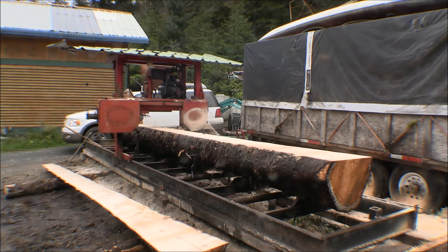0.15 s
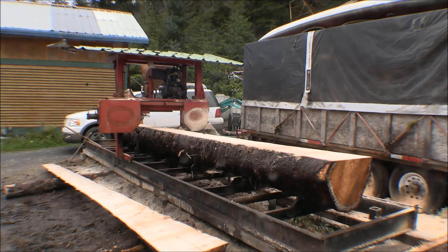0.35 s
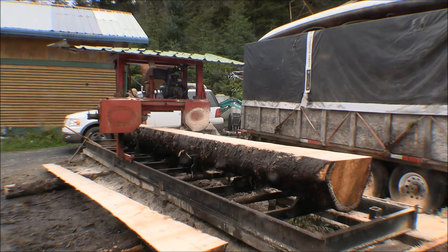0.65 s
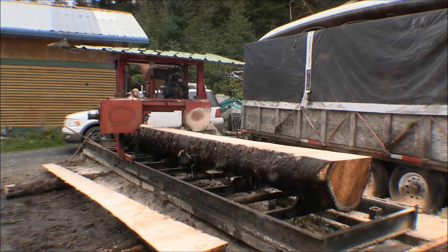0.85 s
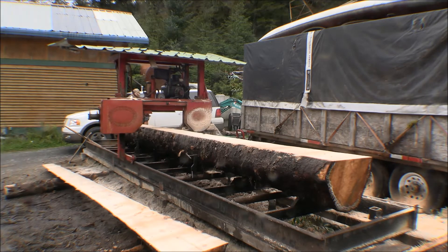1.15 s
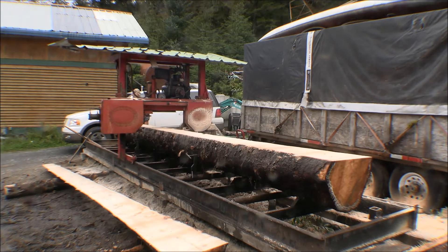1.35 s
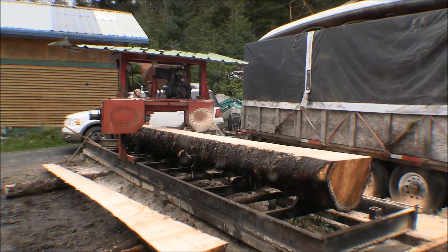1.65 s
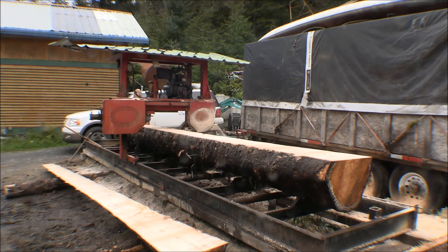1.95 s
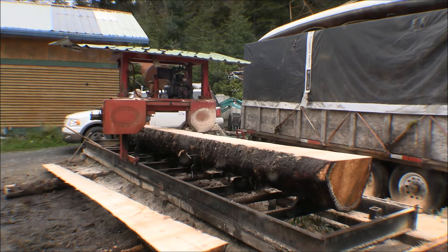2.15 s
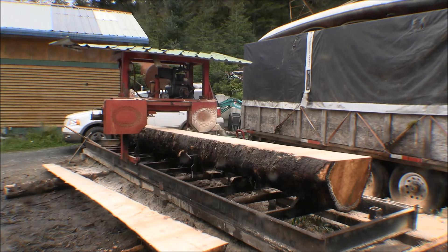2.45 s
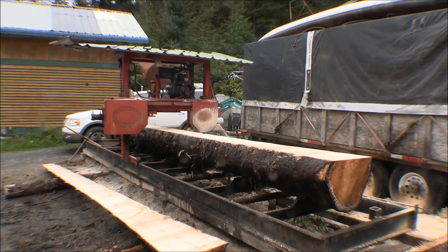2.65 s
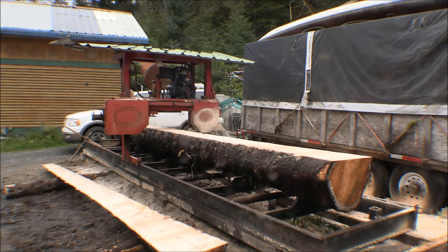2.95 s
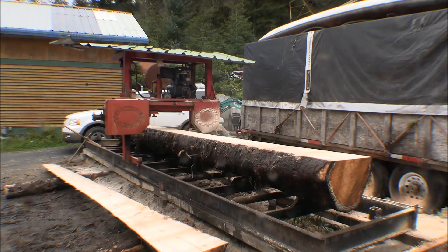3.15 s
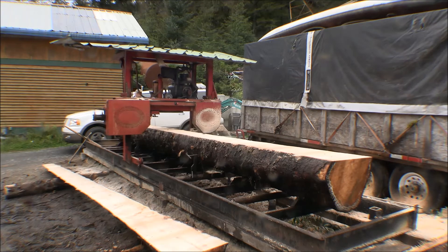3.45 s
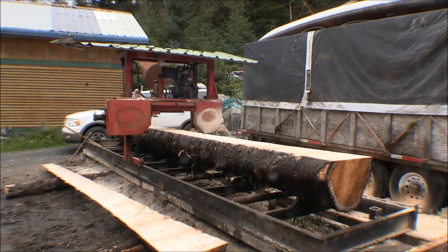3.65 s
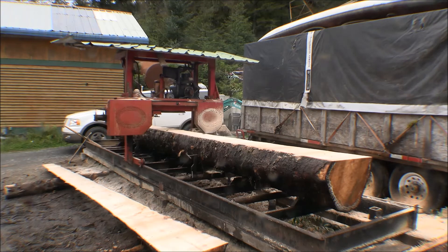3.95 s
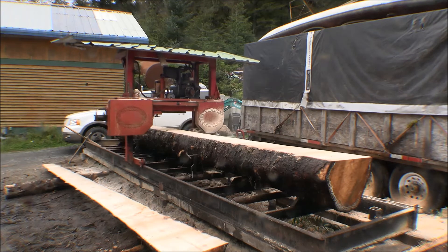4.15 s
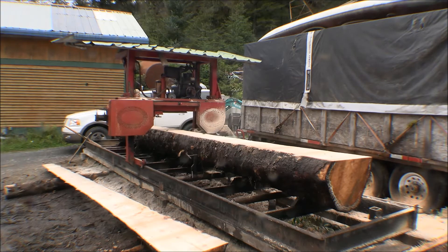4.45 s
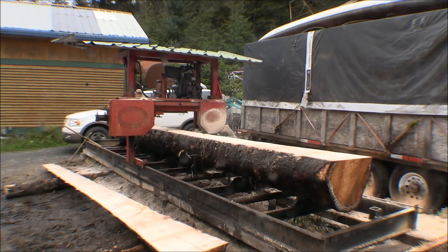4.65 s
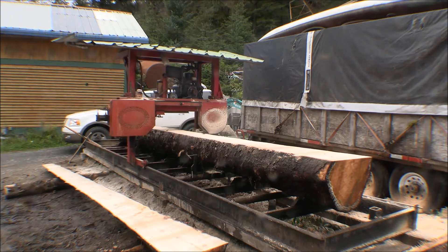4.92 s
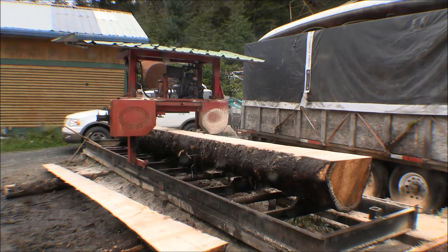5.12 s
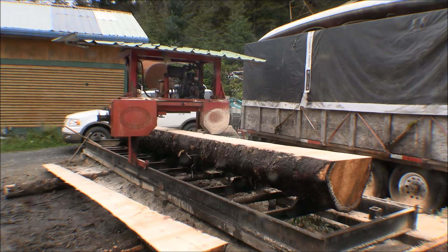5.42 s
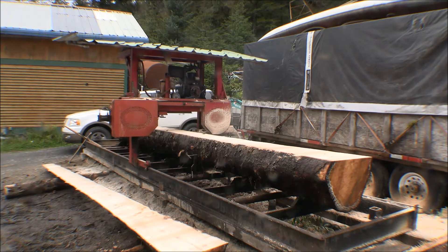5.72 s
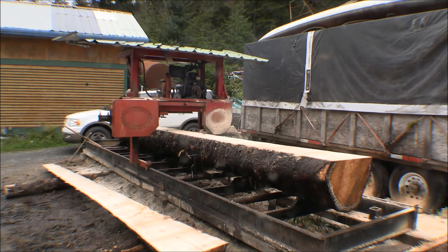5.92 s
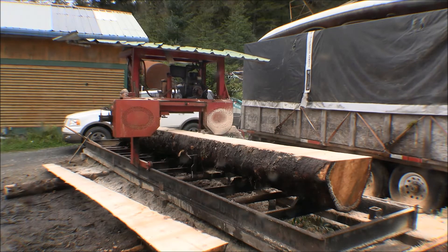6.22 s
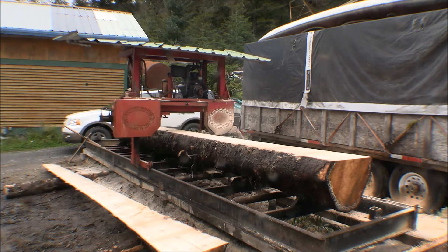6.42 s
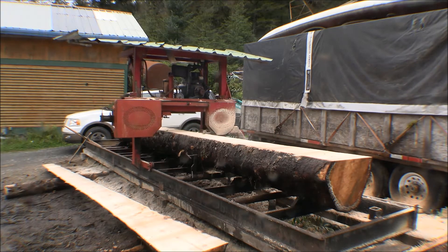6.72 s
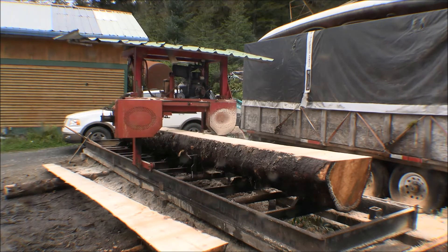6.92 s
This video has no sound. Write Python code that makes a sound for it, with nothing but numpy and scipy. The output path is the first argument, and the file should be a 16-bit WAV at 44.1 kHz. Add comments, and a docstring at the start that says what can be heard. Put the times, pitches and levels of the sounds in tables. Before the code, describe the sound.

Three tiny, falling blade squeaks open over the buzz of a sawmill engine already running under load. The engine keeps an almost constant pitch, with fast mechanical clatter, fine metallic ticking and a slight whine from its belts. Above it, the band blade gives a continuous high hiss as it rips through a log, slowly swelling a little. The machine is in the open air, a few metres in front of the microphone.

```python
"""A band sawmill rips along a log outdoors, a few metres from the microphone and nearly straight ahead.
Its engine hunts slightly around the governed speed under load: a buzzing stack of firing orders with
clatter on every pulse, ticking valves and whining belt-driven parts. The blade hisses in the cut, with
thin peaks in the hiss, and squeaks three times, while the creeping carriage shifts the engine's echo.
A faint low hum dies away in the first seconds."""
import sys
import numpy as np
from scipy import signal
from scipy.fft import rfft, irfft, next_fast_len
from scipy.io import wavfile

SR = 44100
rng = np.random.default_rng(int(sys.argv[2]) if len(sys.argv) > 2 else 0)


def transcribe(signal):
    """Save signal, clipped to [-1, 1], as a 16-bit WAV file at the path in sys.argv[1]."""
    frames = np.atleast_2d(signal).T
    limited = np.clip(frames, -1, 1)
    pcm = np.round(limited * 32767).astype(np.int16)
    wavfile.write(sys.argv[1], SR, pcm)


N = 312228
T = np.arange(N) / SR

# Governed engine speed, sagging as the blade bites near 3 s. Each row: seconds, firings per second.
ENGINE_SPEED = [(0, 107.65), (.6, 107.8), (1.15, 107.58), (1.6, 107.7), (2.65, 107.7), (2.95, 107.35),
                (3.5, 107.78), (4.35, 107.82), (4.7, 107.6), (6.1, 107.68), (7.08, 107.6)]
# The engine's tone; even orders lead. Each row: multiple of the firing rate, relative level in dB.
FIRING_ORDERS = [(1, -54), (2, -20.5), (3, -41), (4, -4.5), (5, -22), (6, -3), (7, -23.5), (8, -13),
                 (9, -13), (10, -9.5), (11, -9), (12, -7), (13, -21), (14, -2.5), (15, -10), (16, -8),
                 (17, -11), (18, -0.96), (19, -17), (20, -10.5), (21, -14.5), (22, -34), (23, -17),
                 (24, -12.5), (25, -14), (26, -9), (27, -10.5), (28, -2.5), (29, -43), (30, -6),
                 (31, -19.5), (32, -13), (33, -16), (34, -11), (35, -21), (36, -18), (37, -16), (38, -11),
                 (39, -28), (40, -41), (41, -19), (42, -18.5), (43, -19), (44, -30), (45, -16), (46, -22),
                 (47, -22.5), (48, -17), (49, -14.5), (50, -17)]
# Orders that beat with their echo from ground and trailer. Each row: order, echo strength from 0 to 1,
# time in seconds at which the two are in step, trend in dB per second.
ORDER_ECHOES = [(4, .4, -1.1, .1), (5, .5, 6.5, -.4), (6, .4, -.8, -1.2), (8, .7, 5.4, .1),
                (9, .15, .9, 1.1), (10, .4, 4.3, -.6), (11, .1, 2.1, .5), (12, .35, .6, -.1),
                (14, .3, 3.3, -.7), (16, .15, 1.8, .1), (18, .05, 1.9, -.35)]
# The cut's hiss grows slowly louder; the clatter steps up near 3 s.
# Each row: time in seconds, clatter level in dB, cut level in dB, both before their trims.
LOAD_LEVELS = [(0, -32.5, -33.5), (1.1, -33, -32.5), (2.7, -33.2, -31.5), (3.05, -32, -31.5),
               (7.08, -31.5, -29.5)]
# Colour of the engine's knocks. Each row: frequency in Hz, relative density in dB.
CLATTER_SPECTRUM = [(30, -39), (130, -36.5), (250, -28), (400, -15.5), (520, -16), (720, -12.5), (950, -8),
                    (1200, -2.5), (1600, 0.3), (2000, -1.5), (2500, -4), (3100, 0), (3800, -2),
                    (6000, -12.5)]
# Colour of the teeth in the cut. Each row: frequency in Hz, relative density in dB.
HISS_SPECTRUM = [(1500, -35), (3300, -33), (4400, -8.5), (5700, -1), (6600, -1.5), (7700, 2), (9000, -2.5),
                 (11000, -7.5), (12200, -4), (13600, -5.5), (14800, -14), (16000, -5.5)]
# Narrow peaks colouring the hiss. Each row: pitch in Hz, width in Hz, first and last level in dB.
HISS_PEAKS = [(470, 6.7, -68, -64), (3020, 86, -52.5, -50), (4500, 69, -67, -46.5), (5260, 72, -50.5, -46),
              (6120, 100, -44, -47), (6800, 32, -43, -53), (7840, 320, -49, -55), (11950, 230, -59, -50),
              (14150, 200, -53, -55), (14900, 200, -50, -50)]
# Slips of the band. Each row: midpoint in seconds, length in seconds, start and end pitch in Hz,
# level in dB, roughness in radians.
BLADE_SQUEAKS = [(0.074, 0.037, 1890, 1740, -24.5, 0.84), (0.219, .044, 1880, 1840, -28, .5),
                 (0.397, .1, 3150, 1406, -34, 1.7)]
# Colour of the valve ticks. Each row: frequency in Hz, relative density in dB.
TICK_SPECTRUM = [(3000, -22), (6500, -2), (8000, 0), (9000, 5), (10000, 5.5), (11000, 3), (12500, -5),
                 (13700, -15), (15000, -16)]
# Belt-driven parts. Each row: multiple of the firing rate, slip in radians, level in dB at the start,
# the middle and the end.
BELT_WHINES = [(18.71, .5, -44.5, -40.7, -43.5), (38.17, 1.2, -58, -50, -49),
               (56.97, .9, -43.5, -53.5, -68)]
# Stereo width: almost mono at 1-2 kHz, wider in the treble. Each row: frequency in Hz, side over mid in dB.
STEREO_WIDTH = [(100, -35), (215, -55), (430, -26.5), (650, -14.5), (1000, -66.5), (1800, -55), (3000, -23),
                (4500, -10.5), (15000, -10.4)]


def crank_turns(hunt_hz=5.3, first_depth=0.15, last_depth=0.044, wander_hz=1.6):
    """Counts firings; the governor hunts about its speed (depth in firings per second) and settles."""
    angle = 2 * np.pi * hunt_hz * T
    hunt = drift(wander_hz) * np.cos(angle) + drift(wander_hz) * np.sin(angle)
    firing_hz = curves(ENGINE_SPEED)[0] + np.linspace(first_depth, last_depth, N) * hunt
    return np.cumsum(firing_hz) / SR


def engine_tone(turns, stack_db=-37, fade_db=0.63, flutter=0.16, uneven=0.079, skew=0.17):
    """Two smeared pulses a firing, locked to the crank; low orders swell, high ones flutter most."""
    echoes = {order: echo for order, *echo in ORDER_ECHOES}
    strength = uneven * drift(51)  # no two firings are equally hard
    out = np.zeros((2, N))
    for order, db in FIRING_ORDERS:
        hz = order * ENGINE_SPEED[0][1]
        swell_db = echo_swell_db(hz, *echoes[order]) if order in echoes else fade_db * drift(3.6)
        flicker = 1 + order / 20 * (strength + flutter * drift(12.5))
        amplitude = np.sqrt(2) * gain_of(stack_db + db + swell_db) * flicker
        # the casing delays the treble; only the even orders keep in step
        smear = .02 * order ** 2 + (np.pi if order % 2 else .75) * rng.standard_normal()
        angle = 2 * np.pi * order * turns - smear + order / 20 * flutter * drift(16)
        # echoes reach the two sides of the microphone out of step
        out += amplitude * paired(np.cos(angle), np.cos(angle + skew * order), hz)
    return out


def echo_swell_db(hz, strength, crest_s, trend_db_per_s, path_m_per_s=.052, sound_m_per_s=343):
    """Tone and echo add and cancel: one swell for each wavelength the carriage shifts the echo's path."""
    wavelengths = path_m_per_s * (T - crest_s) * hz / sound_m_per_s
    depth = np.clip(2 * strength / (1 + strength ** 2), 0, .98)
    return 10 * np.log10(1 + depth * np.cos(2 * np.pi * wavelengths)) + trend_db_per_s * (T - T.mean())


def engine_clatter(turns, level_db, trim_db=1, steady=1, decay=0.27, lag=.33, uneven_db=-0.1):
    """Two noisy knocks to a firing over a steady rush, each followed by a reflection."""
    power = steady + puffs(2 * turns, decay) + puffs(2 * turns - lag, decay)
    envelope = np.sqrt(power) * gain_of(uneven_db * drift(46))
    return gain_of(level_db + trim_db) * stereo_noise(envelope, CLATTER_SPECTRUM)


def cut_hiss(level_db, trim_db=-1, grain_db=0.72):
    """Teeth tear through uneven grain and spray sawdust."""
    grain = gain_of(grain_db * drift(49))
    return gain_of(level_db + trim_db) * stereo_noise(grain, HISS_SPECTRUM)


def hiss_peaks():
    """Narrow bands of noise colour the hiss, some growing and some fading over time."""
    out = np.zeros((2, N))
    for hz, width_hz, first_db, last_db in HISS_PEAKS:
        peak = signal.iirpeak(hz, hz / width_hz, fs=SR)
        mid, side = signal.lfilter(*peak, rng.standard_normal((2, N)))
        out += gain_of(np.linspace(first_db, last_db, N)) * evened(paired(mid, side, hz))
    return out


def blade_squeaks():
    """The band sticks and slips for an instant: short, rough, falling tones."""
    out = np.zeros(N)
    for middle_s, length_s, start_hz, end_hz, db, roughness in BLADE_SQUEAKS:
        progress = np.clip((T - middle_s) / length_s + .5, 0, 1)
        hz = start_hz + (end_hz - start_hz) * progress
        angle = 2 * np.pi * np.cumsum(hz) / SR + roughness * drift(90)
        out += gain_of(db) * np.sqrt(2) * np.sin(np.pi * progress) ** 2 * np.sin(angle)
    return out


def valve_ticks(turns, first_db=-41, last_db=-42, decay=0.066, between=0.41, uneven_db=2):
    """A sharp metallic tick on each firing and a weaker one between: a thin sizzle."""
    power = puffs(turns, decay) + between * puffs(turns - .5, decay)
    level_db = np.linspace(first_db, last_db, N) + uneven_db * drift(50)
    return gain_of(level_db) * stereo_noise(np.sqrt(power), TICK_SPECTRUM)


def tick_ring(turns, first_hz=8350, last_hz=7400, width_hz=600, first_db=-43.5, last_db=-47, decay=0.056):
    """Each main tick rings a thin metal note, whose brightest part sinks as the carriage moves."""
    strikes = rng.standard_normal((2, N)) * np.sqrt(puffs(turns, decay))
    ring = signal.lfilter(*signal.butter(2, width_hz / 2, fs=SR), strikes)
    hz = np.linspace(first_hz, last_hz, N)
    mid, side = ring * np.cos(2 * np.pi * np.cumsum(hz) / SR)
    return gain_of(np.linspace(first_db, last_db, N)) * evened(paired(mid, side, first_hz))


def belt_whines(turns, shimmer_db=1.5):
    """Belt-driven parts whine between the engine orders, following its speed but slipping a little."""
    out = np.zeros(N)
    for ratio, slip, *levels_db in BELT_WHINES:
        level_db = np.interp(T, [0, T[-1] / 2, T[-1]], levels_db) + shimmer_db * drift(18)
        out += gain_of(level_db) * evened(np.sin(2 * np.pi * ratio * turns + slip * drift(8.5)))
    return out


def fading_hum(level_db=-50, fade_s=1.3, rest_hz=571, sag_hz=26, sag_s=.35, lower_db=-17, waver=0.46):
    """A wavering tone over a faint lower octave sags in pitch and dies away, 10 dB down after fade_s."""
    hz = rest_hz + sag_hz * np.exp(-T / sag_s)
    angle = 2 * np.pi * np.cumsum(hz) / SR + waver * drift(12)
    tone = np.sin(angle) + gain_of(lower_db) * np.sin(angle / 2)
    return gain_of(level_db - 10 * (T / fade_s) ** 2) * evened(tone)


def puffs(turns, decay):
    """Power of a burst that starts on each whole turn and dies within a share of it; mean one."""
    power = np.exp(-(turns % 1) / decay)
    return power / power.mean()


def stereo_noise(envelope, spectrum):
    """Noise shaped in time, then coloured; rms one."""
    size = next_fast_len(N, True)
    hz = np.fft.rfftfreq(size, 1 / SR)
    mid, side = rfft(rng.standard_normal((2, N)) * envelope, size)
    coloured = paired(mid, side, hz) * gain_at(spectrum, hz)
    return evened(irfft(coloured, size)[:, :N])


def paired(mid, side, hz):
    """Left and right from mid and side; the two grow less alike in the treble."""
    side = side * gain_at(STEREO_WIDTH, hz)
    return np.array([mid + side, mid - side])


def drift(rate_hz, points=4096, points_per_s=400):
    """Smooth random motion of rms about one, no faster than about the given rate."""
    hz = np.fft.rfftfreq(points, 1 / points_per_s)
    slow = irfft(rfft(rng.standard_normal(points)) / (1 + (hz / rate_hz) ** 4))
    return np.interp(T, np.arange(points) / points_per_s, evened(slow))


def curves(rows):
    """Each column of a timed table, at every sample."""
    seconds, *columns = np.transpose(rows)
    return [np.interp(T, seconds, column) for column in columns]


def gain_at(spectrum, hz):
    """Amplitude from a dB table joined by straight lines over log frequency."""
    table_hz, db = np.transpose(spectrum)
    return gain_of(np.interp(np.log(hz + 1), np.log(table_hz + 1), db))


def gain_of(db):
    """Decibels to amplitude."""
    return 10 ** (np.asarray(db) / 20)


def evened(x):
    """Scales to an rms of one."""
    return x / np.sqrt(np.mean(x ** 2) + 1e-20)


def scene():
    """Engine and blade in the open air, a few metres off and nearly straight ahead."""
    turns = crank_turns()
    clatter_db, cut_db = curves(LOAD_LEVELS)
    engine = engine_tone(turns) + engine_clatter(turns, clatter_db) + belt_whines(turns)
    valves = valve_ticks(turns) + tick_ring(turns)
    blade = cut_hiss(cut_db) + hiss_peaks() + blade_squeaks()
    return engine + valves + blade + fading_hum()


def record(dry, edge_hz=15850):
    """The recorder's band limit cuts off the highest treble."""
    taps = signal.firwin(1023, edge_hz, window=("kaiser", 9), fs=SR)
    return signal.oaconvolve(dry, taps[None], "same")


dry = scene()
out = record(dry)
transcribe(out)
```